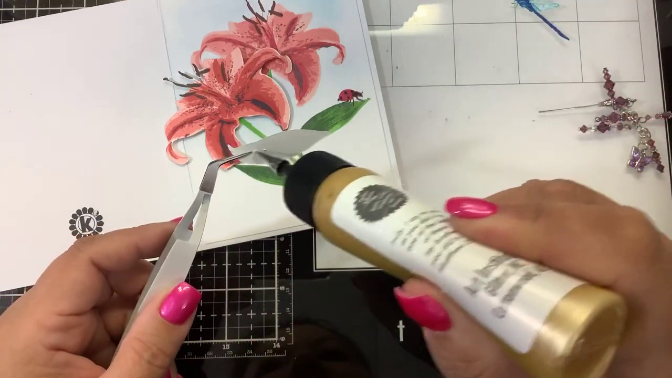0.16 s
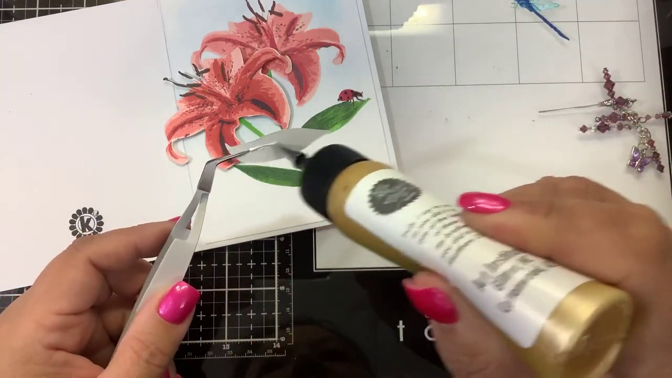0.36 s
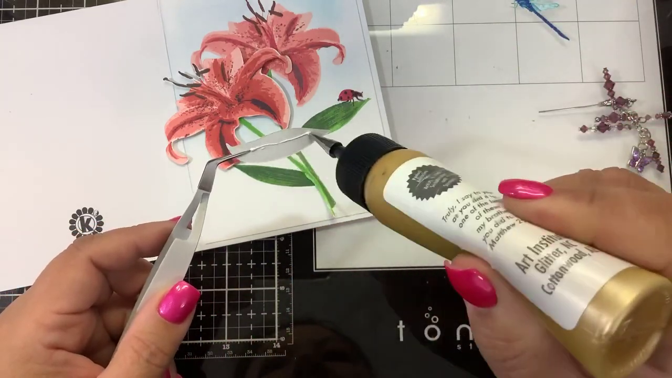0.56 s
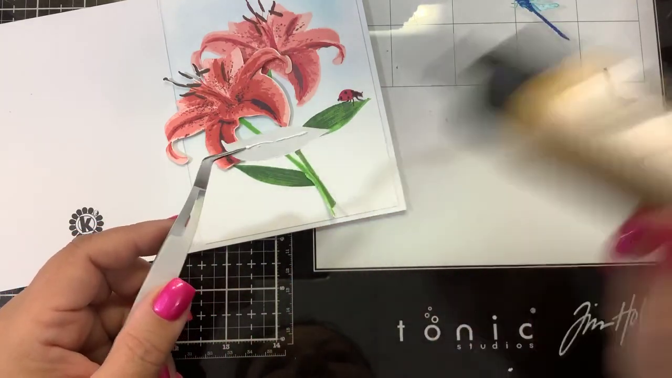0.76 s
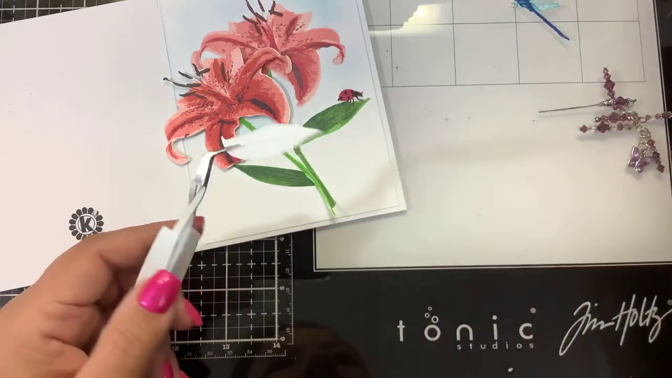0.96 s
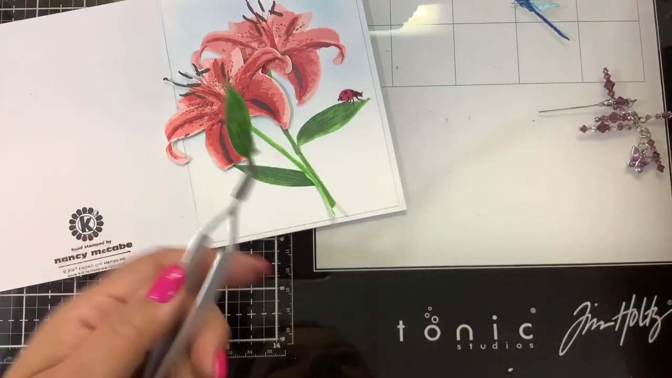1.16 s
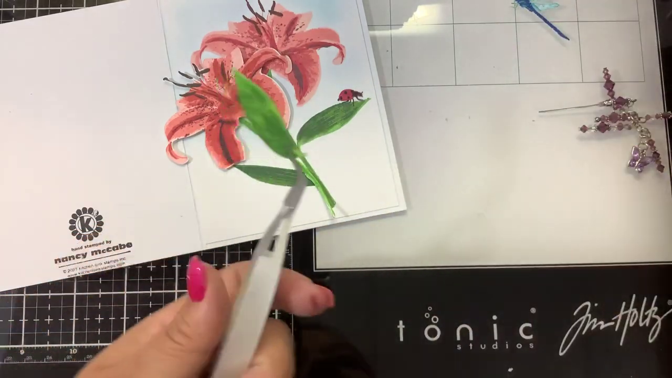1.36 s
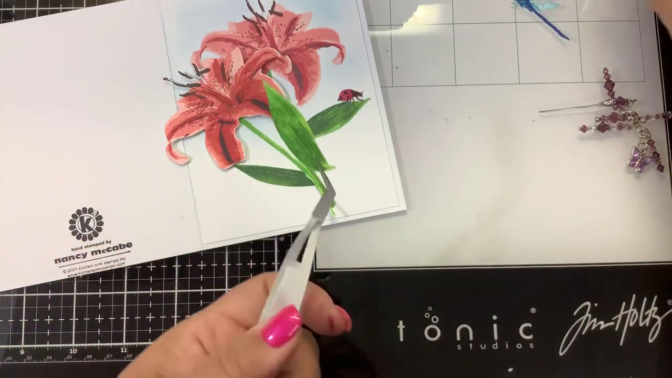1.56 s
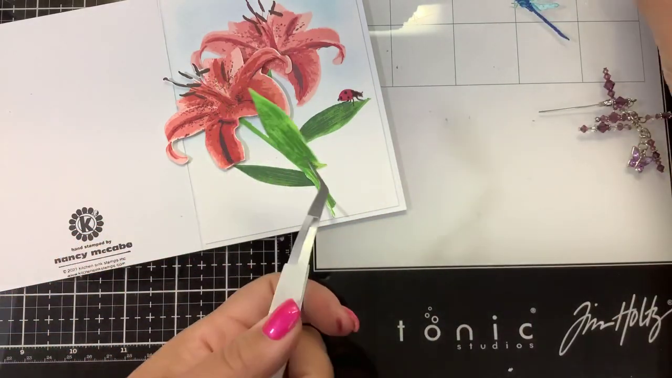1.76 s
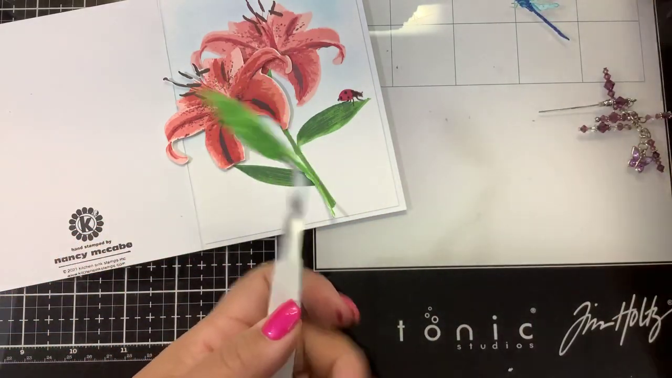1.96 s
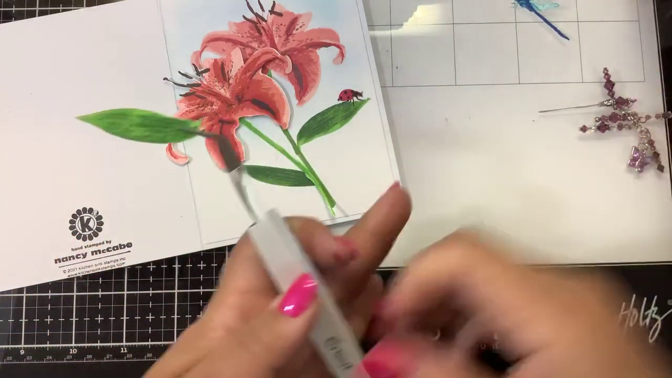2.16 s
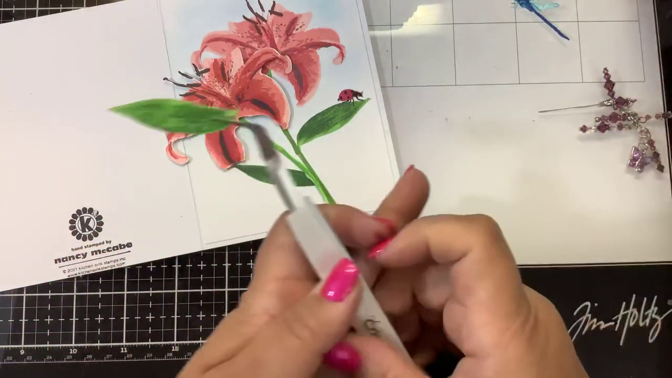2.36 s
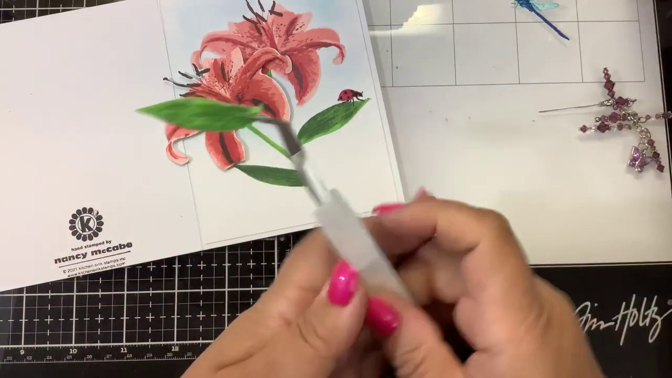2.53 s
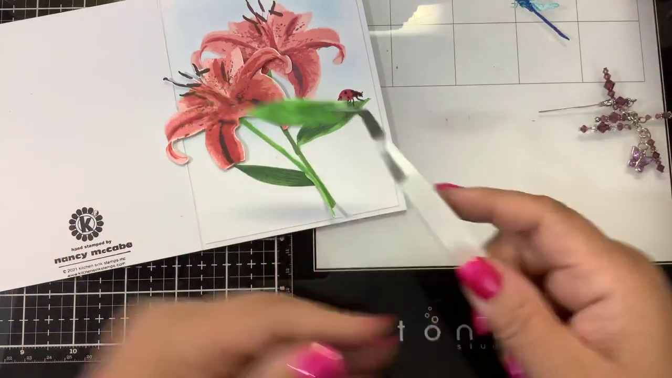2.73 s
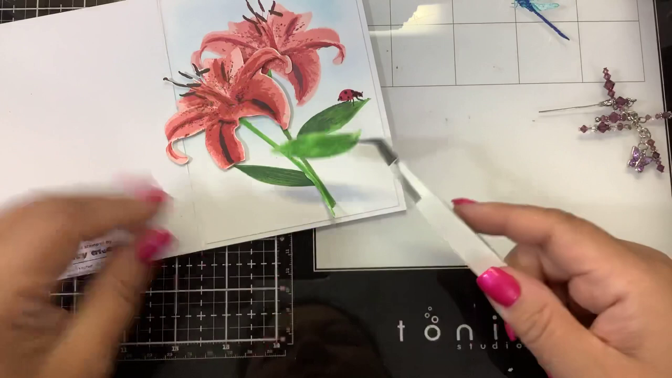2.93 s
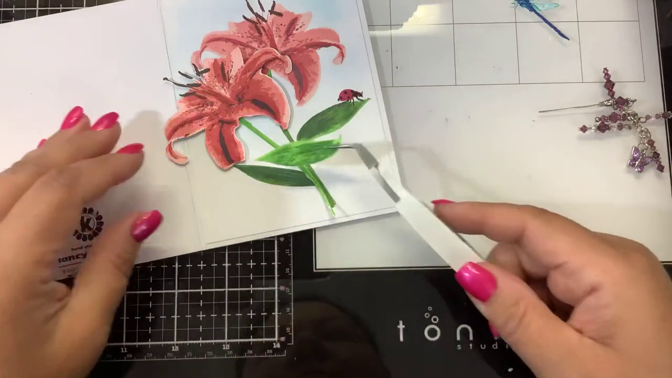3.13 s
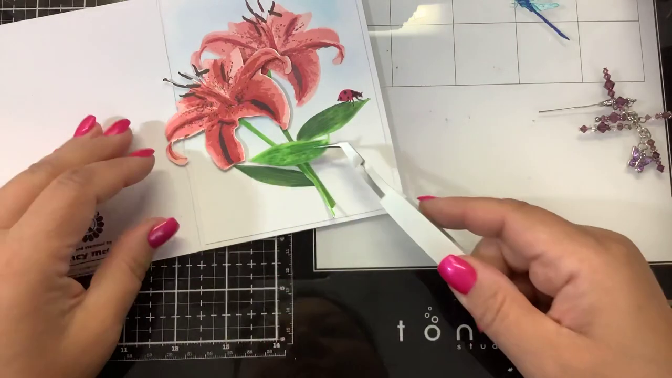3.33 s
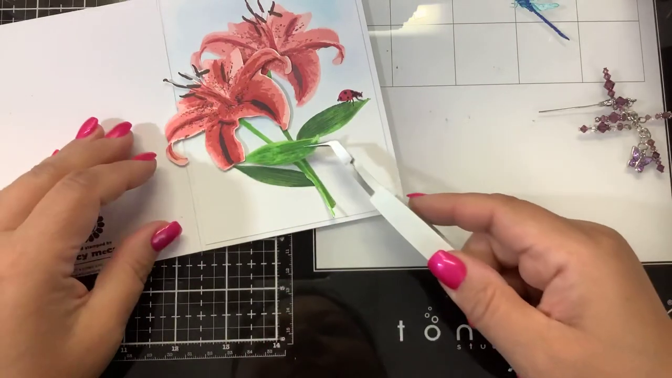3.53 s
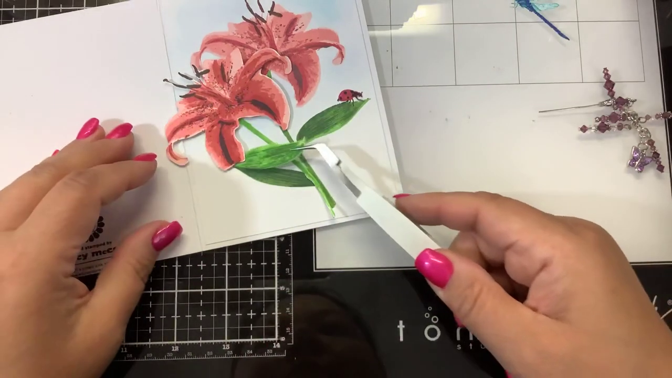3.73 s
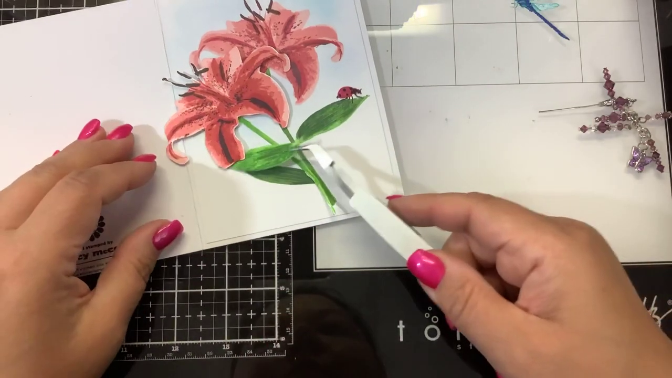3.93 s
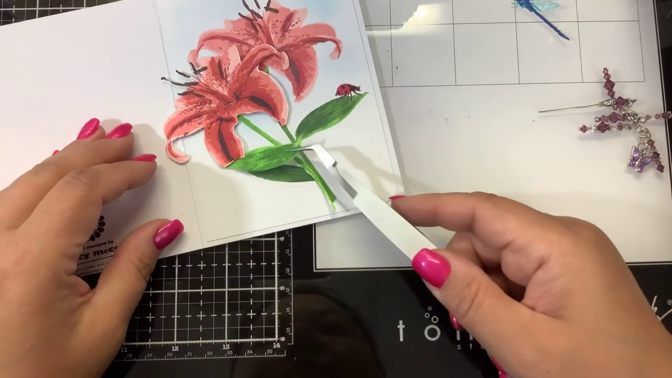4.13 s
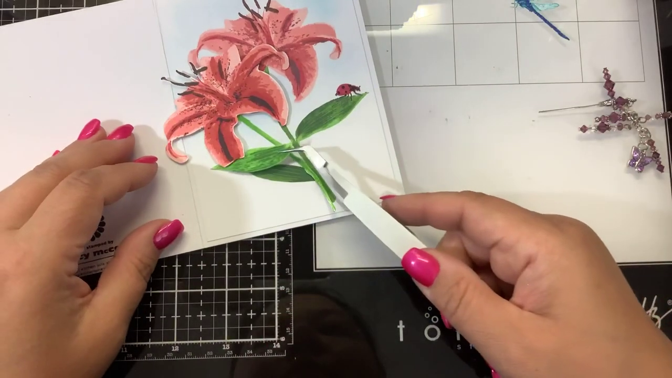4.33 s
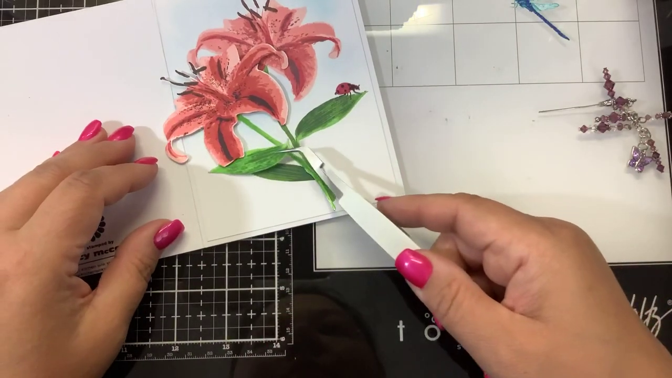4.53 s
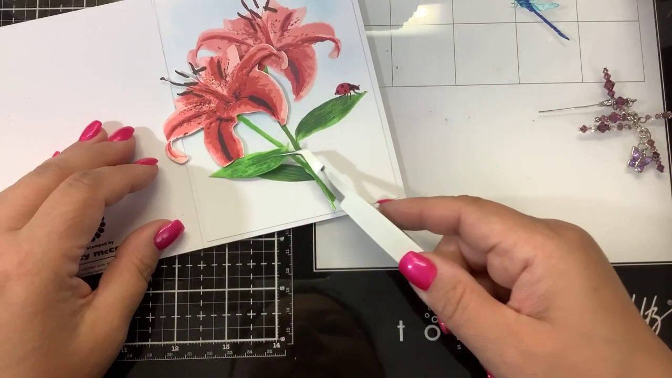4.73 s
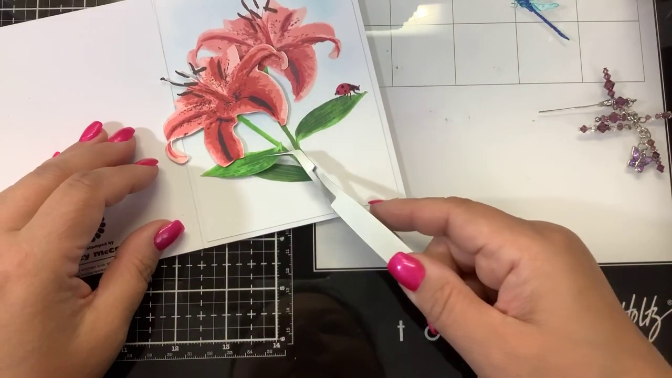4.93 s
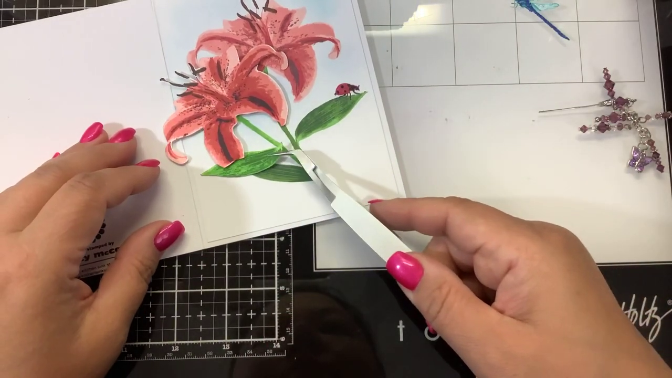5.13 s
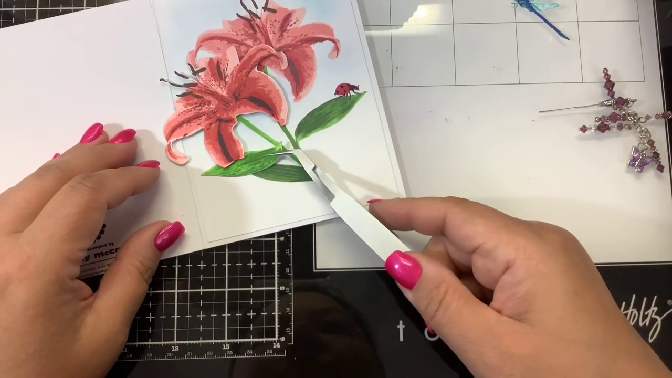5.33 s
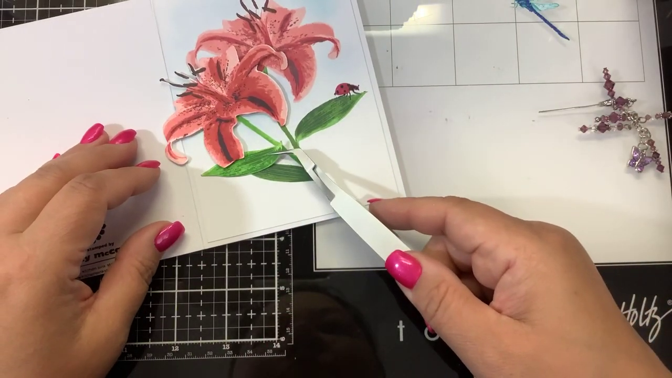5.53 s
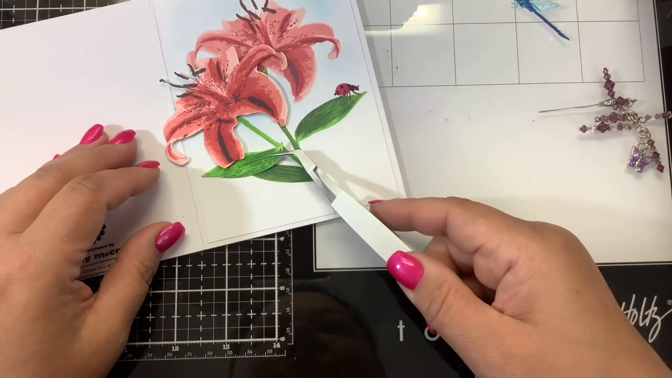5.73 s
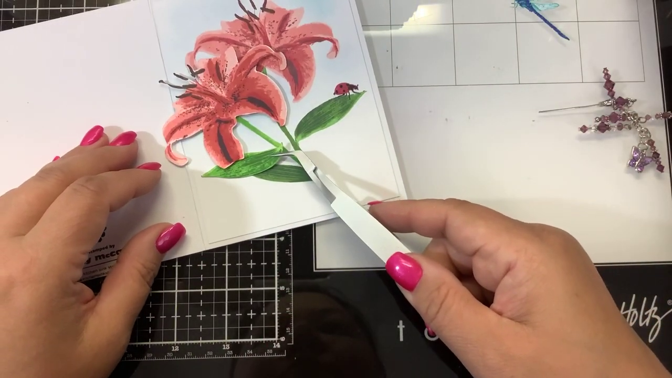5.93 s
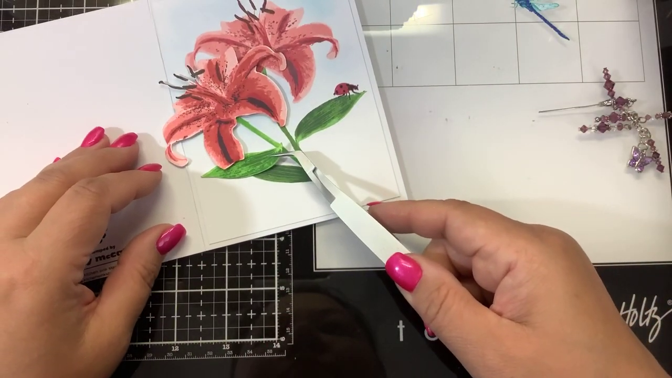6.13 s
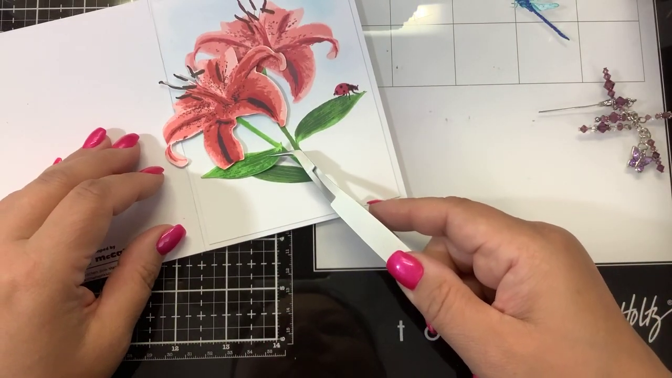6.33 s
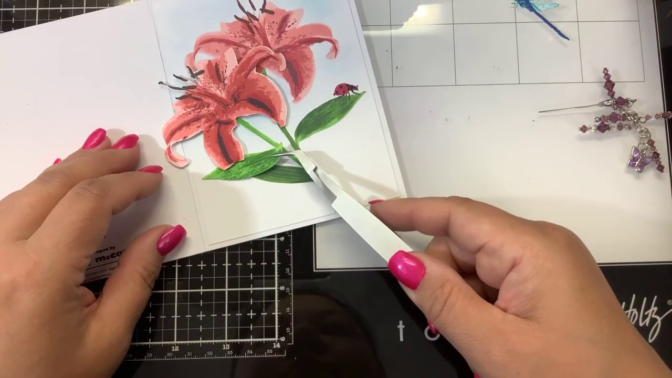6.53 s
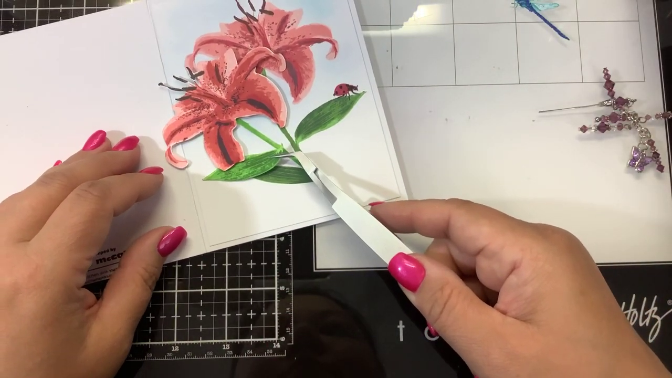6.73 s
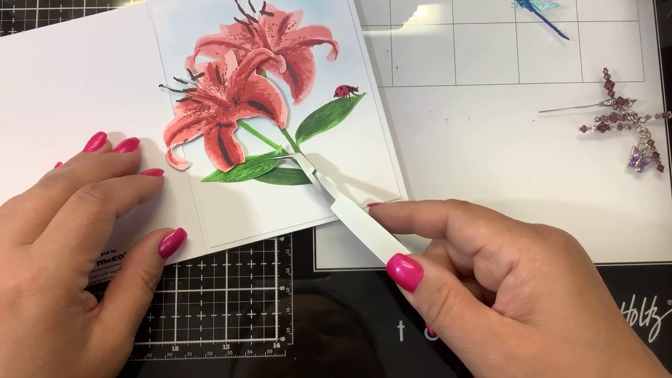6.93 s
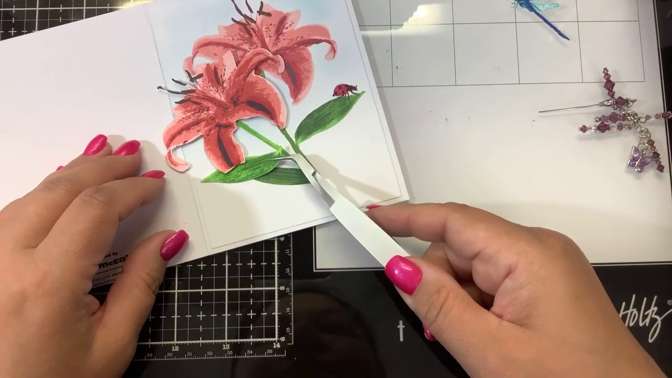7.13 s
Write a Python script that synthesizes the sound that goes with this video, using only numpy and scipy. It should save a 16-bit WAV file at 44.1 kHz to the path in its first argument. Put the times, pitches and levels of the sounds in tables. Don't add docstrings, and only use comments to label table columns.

```python
import sys
import numpy as np
from scipy import signal
from scipy.fft import rfft, irfft, next_fast_len
from scipy.io import wavfile
from scipy.ndimage import uniform_filter1d

SR = 44100
rng = np.random.default_rng(int(sys.argv[2]) if len(sys.argv) > 2 else 0)


def invert_db(x):
    u = np.asarray(x, float) / 20
    return 10 ** u


def pcm_store(signal):
    levels = np.round(np.clip(np.atleast_2d(signal), -1, 1) * 32767)
    wavfile.write(sys.argv[1], SR, levels.astype(np.int16).T)


N = 321489
FADE_DB = 12

# start_s, rim_blow_db, hardness_db, plastic_tap_db
ROCKING = [(1.848, 0.5, 6, -45.5), (1.933, -2, 2, -50), (2.004, -3.5, 2.5, -52), (2.069, -5.5, -0.5, -47.5),
           (2.124, -7, 1.5, -55), (2.175, -7.5, -3, -52.5), (2.223, -8, -2, -62), (2.26, -9, -18, -52),
           (2.291, -11, -18, -57), (2.33, -22, -24, -66)]
# centre_hz, width_hz, level_db
LEAF_MODES = [(327, 170, 2), (710, 150, 9), (1060, 130, 11.5), (1480, 71, 10), (2130, 370, 8),
              (2770, 300, 8), (3060, 300, -8), (4000, 470, 8), (5180, 290, 8.5), (6300, 230, 11.5),
              (8470, 470, 6), (10150, 280, 9), (11500, 490, 5), (13650, 420, 2)]


def unit(x):
    return x / np.sqrt(np.mean(x ** 2) + 1e-20)


def along(points, hz):
    f, v = np.transpose(points)
    return np.interp(np.log(hz + 1), np.log(f + 1), v)


def filtered(x, response):
    m = next_fast_len(len(x) + SR // 2)
    return irfft(rfft(x, m) * response(np.fft.rfftfreq(m, 1 / SR)), m)[:len(x)]


def colour(points):
    return lambda hz: invert_db(along(points, hz))


def modes(rows):
    def response(f):
        total = 0
        for k, (centre, width, db) in enumerate(rows):
            damping = 1j * f * width
            total = total + (-1) ** k * invert_db(db) * damping / (centre * centre - f * f + damping)
        return total
    return response


def bending(rows, lag, lead):
    def response(f):
        delay = np.exp(-4j * np.pi * lag * np.sqrt(180 * f) + 2j * np.pi * f * lead)
        return modes(rows)(f) * delay / (1 + 1j * f / 1500) ** 2
    return response


def noise(response, grit=0., patchy_db=0.):
    sizes = np.minimum(rng.exponential(size=N), 5)
    z = signal.stft(rng.standard_normal(N) * invert_db(grit * sizes), nperseg=256)[2]
    field = uniform_filter1d(rng.standard_normal(z.shape), 5, 0)
    field = uniform_filter1d(field, 9, 1)
    patchy = signal.istft(z * invert_db(patchy_db * unit(field)), nperseg=256)[1][:N]
    return unit(filtered(patchy, response))


def strokes(rows, round_top):
    t = np.arange(0, N + 32, 32) / SR
    power = 0
    for s, rise, fall, db in rows:
        away = np.abs((t - s) / np.where(t < s, rise, fall))
        power = power + invert_db(2 * db - 2 * FADE_DB * away ** round_top)
    return np.interp(np.arange(N) / SR, t, np.sqrt(power))


def contacts(events, centres_hz, body, rise, ring_db, t60, rebound=0., scrape=0.52):
    usual_db, longer_per_db = -40, 0.025
    blow_at = 1.1
    rebound_s = 0.0009
    spread_s, spread_hz, spread_top_hz = 0.0024, 1000, 16000

    def spread(f):
        bent = 2 * np.sqrt(spread_hz * f) - f * np.sqrt(spread_hz / spread_top_hz)
        return np.exp(-2j * np.pi * spread_s * bent)

    out, t = np.zeros(N + SR), np.arange(SR // 10) / SR
    low, mid, high = centres_hz
    for s, db, low_db, high_db in events:
        lasts = t60 * np.exp(longer_per_db * (db - usual_db))
        burst = rng.standard_normal(len(t)) * (1 - np.exp(-t / rise)) * invert_db(-60 * t / lasts)
        blow = np.linalg.norm(burst) * (np.arange(len(t)) == round(blow_at * rise * SR))
        blow = blow - rebound * np.roll(blow, round(rebound_s * SR))
        both = burst + invert_db(ring_db) * filtered(blow + scrape * burst, modes(body))
        tone = [(low / 3.9, low_db - 11.0), (low, low_db), (mid, 0), (high, high_db), (3.0 * high, high_db - 13)]
        sound = filtered(np.pad(both, (64, 0)), lambda f: colour(tone)(f) * spread(f))
        out[round(s * SR) - 64:][:len(sound)] += invert_db(db) * sound / np.abs(sound).max()
    return out[:N]


def noise_floor():
    # hz, db_per_hz
    hiss = [(150, -30), (300, -6), (600, 4), (1300, -5.5), (2500, -3.5), (8000, -0.5), (14000, 2),
            (15900, -1.5)]
    # hz, db_per_hz
    rumble = [(12, -24), (20, 2), (49, 1), (124, -1), (280, -17.5), (450, -22), (580, -67), (990, -120)]
    return invert_db(-65) * noise(colour(hiss), patchy_db=-0.27) + invert_db(-67.5) * noise(colour(rumble))


def fan():
    # peak_s, level_db
    air = [(1.15, -66.5), (2.27, -63.5), (3.048, -67), (4.15, -69.5), (4.87, -71.5), (6.12, -68),
           (6.86, -70.5)]
    # hz, db_per_hz
    air_colour = [(60, -120), (150, -0.5), (300, 4.5), (600, -8.5), (1300, -5.5), (2200, -9.5),
                  (4000, -23.5), (8000, -120)]
    rise_s, fall_s, lull_db = 0.33, 0.35, -75
    swells = strokes([(s, rise_s, fall_s, db) for s, db in air], round_top=1.22)
    return np.hypot(swells, invert_db(lull_db)) * noise(colour(air_colour), patchy_db=1.5)


def lamp():
    # share_of_period, level_db
    pattern = [(0.278, -18), (0.619, -23), (.7, -1), (0.867, -15)]
    # centre_hz, width_hz, level_db
    ballast = [(7680, 200, -11), (9600, 200, -5), (9830, 120, -9), (10180, 150, 0), (10430, 110, -1),
               (10800, 150, -9), (11660, 170, -2), (11990, 100, -7), (12235, 120, -3), (12470, 120, -6)]
    buzz_hz = 119.955
    share, db = np.transpose(pattern)
    starts = np.arange(1, int(N / SR * buzz_hz) - 2)[:, None]
    at = ((starts + share) / buzz_hz * SR).ravel()
    sizes = invert_db(db + 2.0 * rng.standard_normal((len(starts), len(db)))).ravel()
    near = np.floor(at)[:, None] + np.arange(-7, 9)
    off = near - at[:, None]
    pulses = sizes[:, None] * np.sinc(off) * np.cos(np.pi * off / 16) ** 2
    sparks = np.bincount(near.astype(int).ravel(), pulses.ravel(), N)
    return invert_db(-72.0) * unit(filtered(sparks, modes(ballast)))


def room(x):
    # hz, t60_s
    decay = [(300, 0.096), (2000, 0.099), (6000, 0.069), (14000, 0.083)]
    out, step = np.zeros(N + SR), SR // 4
    for start in range(0, N, step):
        hz, t, z = signal.stft(rng.standard_normal(step), SR, nperseg=128)
        fade = invert_db(-60 * t / along(decay, hz)[:, None])
        tail = signal.istft(z * fade, SR, nperseg=128)[1]
        wet = signal.fftconvolve(x[start:start + step], tail / np.linalg.norm(tail))
        out[start + 90:][:len(wet)] += wet
    return out[:N]


def sleeve():
    # peak_s, rise_s, fall_s, level_db
    swish = [(1.03, 0.086, 0.094, -46), (1.13, .05, 0.064, -57.5)]
    # peak_s, rise_s, fall_s, level_db
    swish_body = [(1.01, 0.092, 0.18, -58)]
    # start_s, peak_db, low_db, high_db
    snags = [(0.9667, -37, -10, 3), (0.9824, -37, -12, 1), (1.0115, -33, -15, -1), (1.0454, -35, -12, 3),
             (1.0794, -31, -16, 5)]
    sheen_colour = [(5000, -30), (9000, -4.5), (12500, -1.5), (15200, 4), (15900, 0)]
    body_colour = [(2500, -20), (4600, -10), (5200, -10.5), (5800, -8.5), (8500, -8.0), (11000, -25)]
    cloth = strokes(swish, round_top=2.6) * noise(colour(sheen_colour), grit=3.4, patchy_db=2.2)
    cloth += strokes(swish_body, round_top=0.8) * noise(colour(body_colour), grit=2.5, patchy_db=2.2)
    return cloth + contacts(snags, (6000, 10000, 15000), [(15300, 600, 0)], rise=0.0005, ring_db=1, t60=0.014)


def card_slides():
    # peak_s, rise_s, fall_s, level_db
    brushes = [(1.38, 0.18, 0.2, -62), (1.542, 0.026, 0.017, -59), (2.2, .3, 0.52, -63.5),
               (2.49, .07, 0.23, -63), (2.74, 0.19, 0.21, -65), (3.356, .03, .04, -61),
               (3.72, 0.34, 0.11, -59.5), (3.898, 0.015, 0.042, -55), (3.975, 0.03, 0.08, -53),
               (4.075, .03, .03, -57.5), (4.2, 0.12, 0.09, -59), (4.373, 0.05, 0.033, -60.5),
               (4.528, 0.02, 0.022, -59), (4.62, 0.079, 0.016, -58.5), (4.83, 0.22, 0.2, -60),
               (5.068, .008, 0.035, -58.5), (5.74, 0.11, .1, -68), (6.56, 0.11, .06, -69),
               (6.77, .08, 0.09, -67), (7.0, .07, 0.065, -66), (7.28, 0.018, .03, -59.5)]
    # peak_s, rise_s, fall_s, level_db
    pushes = [(2.27, 0.18, 0.16, -77), (3.355, 0.039, 0.019, -59.5), (3.72, 0.33, 0.14, -72),
              (3.91, .015, .035, -70), (3.975, .025, .05, -66), (4.06, .05, 0.059, -68.5),
              (4.13, .04, 0.044, -69.5), (4.19, .02, .04, -70), (4.29, 0.074, .08, -72.5),
              (4.378, 0.022, .015, -73), (4.635, .035, .035, -71), (4.705, .02, .03, -68),
              (4.785, 0.077, 0.048, -67), (4.88, 0.044, 0.049, -70.5), (7.28, 0.027, .03, -87)]
    # hz, db_per_hz
    skin = [(5000, -28), (8500, -4.5), (10500, 3), (12200, -4), (14000, 4.5), (15800, -1)]
    # hz, db_per_hz
    paper = [(1000, -9), (2000, -0.5), (4200, -4.5), (6800, 2.5), (8500, 1), (11000, -37)]
    # centre_hz, width_hz, level_db
    card = [(2515, 130, -4), (2850, 75, 0.5), (4300, 210, -12)]
    resting_db, brush_grain_db, push_grain_db = -80.5, -9, 1
    firm_db, grain_grows = -60.5, 2
    brush, push = strokes(brushes, round_top=1.25), strokes(pushes, round_top=1.26)
    fine = np.hypot(brush, invert_db(resting_db))
    push_grain = invert_db(push_grain_db + firm_db) * (push / invert_db(firm_db)) ** grain_grows
    coarse = np.hypot(invert_db(brush_grain_db) * brush, push_grain)
    slide = fine * noise(colour(skin), grit=3.1, patchy_db=3.0)
    slide += coarse * noise(colour(paper), grit=3.4, patchy_db=2.5)
    return slide + push * noise(modes(card), grit=3.7, patchy_db=2)


def palm():
    # peak_s, rise_s, fall_s, level_db
    shifts = [(5.95, 0.14, .12, -75), (4.15, .2, 0.17, -76), (2.39, .1, .2, -74.5)]
    dull = modes([(1300, 400, -2), (1800, 360, -2)])
    return strokes(shifts, round_top=1.6) * noise(dull, grit=3, patchy_db=5.5)


def leaf_creaks():
    # peak_s, rise_s, fall_s, level_db
    creaks = [(6.163, .02, 0.01, -60.5), (1.8, 0.065, 0.072, -74)]
    return strokes(creaks, round_top=2.0) * noise(modes(LEAF_MODES[4:11]), grit=3.6)


def leaf_release():
    # start_s, peak_db, low_db, high_db
    loosen = [(6.1302, -47, -1, -14), (6.1335, -51, 1, -14)]
    # centre_hz, width_hz, level_db
    corner = [(1210, 200, -1), (2000, 240, 8), (2900, 300, 4), (3800, 300, 4), (4600, 260, 9)]
    # start_s, peak_db, low_db, high_db
    snaps = [(6.1722, -27.5, -11, -0.5), (6.1738, -28, -8.5, -5), (6.1785, -40.5, 4.5, -2)]
    free = contacts(loosen, (900, 3000, 8000), corner, rise=0.001, ring_db=3, t60=0.038, scrape=0.3)
    return free + contacts(snaps, (900, 4000, 11000), LEAF_MODES, rise=0.0007, ring_db=0.5, t60=0.015,
                           rebound=0.34, scrape=0.3)


def nails():
    # start_s, peak_db, low_db, high_db
    nail_taps = [(1.276, -29.5, -53, -6.5), (1.2784, -39, -46, -7)]
    # centre_hz, width_hz, level_db
    handle = [(730, 120, 16), (1510, 200, 7), (2880, 85, 14), (6580, 430, -6), (7200, 94, -3),
              (8440, 380, 12), (11300, 130, 5), (14300, 2500, 14.5), (15600, 250, 1)]
    # start_s, peak_db, low_db, high_db
    flick = [
        (2.2277, -39, -30, 14),
        (2.2294, -26, -14, -2.5),
        (2.2306, -30, -9.5, -6),
    ]
    # centre_hz, width_hz, level_db
    flick_ring = [(726, 81, 17), (1500, 200, 5), (2880, 88, 8), (5080, 150, -4), (6050, 160, 6.5),
                  (6380, 100, 13), (6730, 160, 9.5), (9140, 120, -5), (11650, 100, 4), (13300, 300, 3),
                  (14400, 600, 6.5), (15100, 170, 13)]
    bands = (2200, 7000, 14000)
    steel = contacts(nail_taps, bands, handle, rise=0.00024, ring_db=0.0, t60=0.0075)
    return steel + contacts(flick, bands, flick_ring, rise=0.00029, ring_db=0.0, t60=0.0075, scrape=0.36)


def pings():
    # (centre_hz, width_hz, level_db)
    blows = [(3.195, [(1106, 37, 3), (1437, 44, 5)]), (3.296, [(1100, 39, -5), (1434, 45, -7)])]
    out = np.zeros(N)
    for s, arms in blows:
        blow = 1. * (np.arange(N) == round(s * SR))
        out += filtered(blow, lambda f: modes(arms)(f) / (1 + 1j * f / 2000) ** 2)
    return out


def tips():
    # start_s, peak_db, low_db, high_db (tone against the middle band)
    clicks = [(3.894, -52, 3, 6), (4.37, -55, -5, 3), (4.9135, -43, 8, 7), (5.069, -58, -10, 18),
              (5.7458, -50, 0, 9), (6.5515, -55, -7, 10)]
    # centre_hz, width_hz, level_db
    steel = [(1112, 45, 11), (2600, 400, 5.5), (1450, 60, 4), (4050, 450, 5.5), (5075, 330, 2.5),
             (7320, 300, 5), (6105, 300, 2.5), (8434, 300, 5.5), (10200, 350, 6), (11700, 600, 8),
             (14030, 450, 7), (15250, 350, 9)]
    # start_s, peak_db, low_db, high_db
    knock = [(3.1912, -45, -15, -10), (3.1928, -20, -10, -5), (3.1943, -16.5, -9.5, -6)]
    # centre_hz, width_hz, level_db
    knock_ring = [(1970, 260, -1.5), (2750, 400, 7), (4930, 180, 8.5), (6120, 390, 4), (6940, 160, 4),
                  (7320, 160, 8.5), (8370, 340, 7), (10300, 240, 5), (11370, 150, 8), (12030, 130, 9),
                  (13900, 280, 10), (15300, 270, 10)]
    # start_s, peak_db, low_db, high_db
    reknock = [
        (3.2943, -28.5, -8.5, -13),
        (3.2957, -29, -10, -12),
    ]
    # centre_hz, width_hz, level_db
    reknock_ring = [(604, 330, -2), (2050, 170, 5), (2690, 260, 10), (3800, 130, 4.5), (3960, 200, 12.5),
                    (4420, 300, 3), (4900, 170, 7), (6120, 100, 11), (7600, 500, 1), (10400, 150, 3),
                    (11940, 200, 11), (13900, 150, 11)]
    # start_s, peak_db, low_db, high_db
    catch = [(4.603, -58, -30, -30)]
    out = contacts(clicks, (1800, 6000, 12500), steel, rise=0.0013, ring_db=3.0, t60=0.014, rebound=0.45)
    out += contacts(knock, (1800, 6000, 12500), knock_ring, rise=0.0005, ring_db=0.0, t60=0.0097, scrape=0.29)
    out += contacts(reknock, (1800, 5000, 12500), reknock_ring, rise=0.0006, ring_db=-1.5, t60=0.014, scrape=0.17)
    return out + contacts(catch, (2500, 4250, 7000), [(4220, 120, 12)], rise=0.002, ring_db=11, t60=0.04)


def gliding_tones():
    # peak_s, half_length_s, pitch_hz, glide_hz_per_s, level_db
    glides = [(.305, .016, 2230, 3000, -71), (0.3, .012, 4050, -8000, -65), (.344, .008, 3400, -15000, -67),
              (.356, 0.011, 2700, -20000, -68), (0.42, 0.015, 1420, 2000, -77),
              (.361, .009, 1500, 3000, -68), (.355, 0.013, 7550, 8000, -54.5),
              (.448, 0.012, 1440, 2000, -65.5), (0.64, 0.01, 3400, 12000, -73), (.428, .004, 6720, 0, -60),
              (.457, 0.0072, 4800, -5000, -67), (.335, 0.018, 6950, 3000, -65),
              (.345, 0.0076, 5100, 0, -61), (.453, .008, 7600, 0, -67), (1.07, 0.066, 5250, 6000, -69),
              (.914, 0.0091, 650, 0, -54), (.922, 0.01, 650, 0, -49.5), (.912, .005, 1200, 0, -53),
              (.922, .006, 1320, 0, -53), (6.965, 0.0072, 3500, 8000, -72), (.957, 0.014, 450, 0, -49.5),
              (.968, 0.019, 676, 0, -61), (4.871, .003, 7000, 0, -59), (5.074, .007, 14800, 0, -53),
              (5.076, .012, 12000, 0, -59)]
    width_hz = 160
    out, t = np.zeros(N), np.arange(-SR // 20, SR // 20) / SR
    for s, half, hz, glide, db in glides:
        a, b = uniform_filter1d(rng.standard_normal((2, len(t))), size=int(SR / width_hz / 2), axis=1)
        phase = 2 * np.pi * (hz * t + glide * t * t / 2)
        tone = unit((1 + 0.6 * unit(a)) * np.cos(phase) + 0.85 * unit(b) * np.sin(phase))
        out[round(s * SR) - SR // 20:][:len(t)] += invert_db(db - FADE_DB * (t / half) ** 2) * tone
    return out


def nozzle():
    # peak_s, rise_s, fall_s, level_db
    gluing = [
        (0.346, 0.053, 0.026, -55.5),
        (0.438, 0.014, 0.092, -56.5),
        (0.294, 0.03, .025, -71),
    ]
    # centre_hz, width_hz, level_db
    resonances = [
        [(1450, 130, -8), (2360, 240, -6.5), (2800, 540, -10), (3660, 540, -12), (5080, 330, -3),
         (7000, 250, -3), (7400, 240, -1), (9340, 500, -0.5), (10800, 670, -6), (11900, 500, -10),
         (12800, 500, -4), (15500, 420, -2)],
        [(1480, 240, -4), (3300, 900, -9), (4970, 280, -1), (6800, 540, -3.5), (8800, 370, 1),
         (10000, 790, 1.5), (11900, 650, -3), (13000, 600, 2), (15300, 700, 0)],
        [(2250, 190, 7), (3520, 550, 5), (5300, 400, 0), (7200, 550, -8)],
    ]
    flatness = [2.8, 1.4, 1.3]
    out = np.zeros(N)
    for stroke, top, tip in zip(gluing, flatness, resonances):
        out += strokes([stroke], top) * noise(modes(tip), grit=4.1, patchy_db=2.5)
    return out


def bottle_drag():
    # peak_s, rise_s, fall_s, level_db
    drag = [(.910, 0.0048, 0.012, -47), (.922, .008, 0.019, -46), (.941, 0.016, .01, -47),
            (.956, 0.012, 0.024, -45), (.977, 0.011, 0.011, -50), (.999, .004, 0.011, -61),
            (1.022, .01, 0.011, -59.5)]
    # centre_hz, width_hz, level_db
    tilted = [(300, 130, -7), (620, 98, 1.5), (745, 93, 0.5), (1280, 84, -0.5), (1360, 90, 0.5),
              (1700, 130, -6), (2020, 300, -13), (2970, 300, -21)]
    # centre_hz, width_hz, level_db
    hollow = [(207, 40, 4), (333, 86, -1.5), (460, 63, 2.5), (676, 70, 3.5), (820, 180, -0.5),
              (1230, 150, -4), (1720, 89, -7), (2100, 130, -6.5), (2950, 400, -17)]
    start = strokes(drag[:2], round_top=2.4) * noise(modes(tilted), grit=3.6)
    return start + strokes(drag[2:], round_top=2.7) * noise(modes(hollow), grit=6.6)


def bottle_taps():
    # start_s, peak_db, low_db, high_db
    taps = [(0.7918, -47, -4, -6), (0.818, -51.5, 17, 0), (0.9048, -47, 5, -20), (1.7018, -28.5, 2.5, -4.5),
            (1.7077, -43, 5, -4), (3.5277, -52, -0.5, -24), (3.618, -51.5, 2, 1), (3.802, -63, -1, -15)]
    # start_s, peak_db, low_db, high_db
    jerks = [(0.9378, -40.5, -6, -21), (0.9492, -39, 9, -16), (0.9546, -34, 11, -19)]
    # start_s, peak_db, low_db, high_db
    touch = [(1.6775, -31.5, -2.5, -5.5)]
    # centre_hz, width_hz, level_db
    plastic = [(1270, 160, 10.5), (1490, 280, 7.5), (1970, 210, 7.5), (2880, 190, 4.5), (3080, 140, 5),
               (3840, 320, 7), (6240, 130, 7)]
    # centre_hz, width_hz, level_db
    edge = [(700, 300, -5), (1210, 51, 13), (1760, 160, 7), (2700, 140, 10.5), (4000, 180, 0),
            (4840, 190, -12), (6350, 150, 1)]
    lead_s, low_db, high_db = 0.0012, -1, -10
    rocks = [(s - lead_s, tap_db, low_db, high_db) for s, _, _, tap_db in ROCKING]
    bands = (1300, 3200, 7500)
    out = contacts(taps, bands, plastic, rise=0.000535, ring_db=-3.5, t60=0.02)
    out += contacts(jerks, bands, plastic, rise=0.0004, ring_db=-5, t60=0.0066)
    out += contacts(rocks, bands, plastic, rise=0.000534, ring_db=-3.5, t60=0.03)
    return out + contacts(touch, (1200, 2800, 7000), edge, rise=0.000966, ring_db=5.0, t60=0.024, scrape=0.28)


def table_top():
    # centre_hz, width_hz, level_db
    base_modes = [(99.3, 9.9, 19.6), (131.5, 4, 19.7), (140.4, 8.3, 31.2), (171.3, 28.9, 32.4),
                  (191, 22.3, 33.4), (223.5, 26.3, 26.7), (264.2, 29.5, 37.5), (264, 27.2, 37.2)]
    # centre_hz, width_hz, level_db
    rim_modes = [(139.4, 6, 18.5), (170.9, 79.4, 34.1), (176, 90, 34.4), (217.5, 90, 17.5),
                 (304.8, 6, -6.5)]
    # centre_hz, width_hz, level_db
    mat = [(562, 70, 2.5), (670, 84, -7), (773, 24, -7), (1030, 150, -18), (1233, 40, -5), (1423, 36, -2)]
    # centre_hz, width_hz, level_db
    late_sheet = [(405, 34, 6.5)]
    # centre_hz, width_hz, level_db
    legs = [(42, 28, 7), (92, 31, -3)]
    # centre_hz, width_hz, level_db
    rim_legs = [(94, 50, -2)]
    # start_s, level_db
    nudges = [(0.819, -34), (.948, -26.5), (6.18, -34.5)]
    set_down_s, settle_s, settle_db = 1.703, 0.048, -22
    t = np.arange(N) / SR
    flat, rim, hard, soft = np.zeros((4, N))
    for s, db in nudges:
        soft[round(s * SR)] = invert_db(db)
    flat[round(set_down_s * SR)] = 1
    flat[round((set_down_s + settle_s) * SR)] = invert_db(settle_db)
    hard[round(set_down_s * SR)] = invert_db(9.5)
    for s, rim_db, hard_db, _ in ROCKING:
        rim[round(s * SR)] = invert_db(rim_db)
        hard[round(s * SR)] = invert_db(hard_db - 13)

    lifts = invert_db(np.interp(t, [1.785, 1.8], [0, -5]))
    leans = np.interp(t, [2.14, 2.22], [0, 0.7])
    low = lifts * filtered(flat, bending(base_modes, 0.005246, 0.00124))
    low += filtered(rim, bending(rim_modes, 0.006172, 0.00327))
    low -= leans * filtered(rim, bending(rim_modes[:1], 0.006172, 0.00327))
    low = filtered(low, lambda f: 1 / (1 + (f / 500) ** 10) / (1 + (52 / (f + 1)) ** 8))
    low *= invert_db(np.interp(t, [2.31, 2.36], [0, -20]))

    swing = uniform_filter1d(np.abs(low), size=300, origin=-140)
    scraps = colour([(4000, -16), (8000, -11), (11800, 0), (15000, -6)])
    rattle = invert_db(-25.0) * swing * noise(scraps, grit=2.7)
    nudge = filtered(soft, bending([(213, 25.0, 28.7), (283, 94, 13.0)], 0.00535, 0.0027))
    sheets = filtered(hard, lambda f: bending(mat, 0.00902, 0.002)(f) / (1 + (440 / (f + 1)) ** 6))
    sheets += filtered(hard, lambda f: bending(late_sheet, 0.021, 0.001)(f) / (1 + (320 / (f + 1)) ** 6))
    sway = filtered(flat, bending(legs, 0.0048, 0.0012))
    sway += filtered(rim, bending(rim_legs, 0.00474, 0.00095))
    return low + sway + nudge + rattle + sheets


def scene():
    background = noise_floor() + fan() + lamp()
    hands = sleeve() + card_slides() + palm() + leaf_creaks()
    tweezers = tips() + nails() + pings() + leaf_release()
    bottle = bottle_taps() + bottle_drag() + nozzle() + gliding_tones()
    near, wood = tweezers + bottle, table_top()
    upper = filtered(wood, lambda f: 1 / (1 + (330 / (f + 1)) ** 6))
    echo = invert_db(-22.5) * np.roll(near, round(0.0075 * SR))
    wet = room(invert_db(-9.5) * near + invert_db(-6.0) * upper)
    return (near + echo + wet + wood + hands + background)[None]


def band_limit(x):
    return signal.sosfilt(signal.butter(12, 17000, fs=SR, output="sos"), x)


def record(dry):
    main = filtered(dry[0], lambda hz: hz < 15880)
    top = filtered(dry[0] - main, lambda hz: hz < 17000)
    loud = np.abs(uniform_filter1d(top ** 2, size=256)) > invert_db(-62) ** 2
    gate = uniform_filter1d(loud * 1., size=128)
    return band_limit((main + invert_db(-20) * top * gate)[None])


dry = scene()
out = record(dry)
pcm_store(out)
```